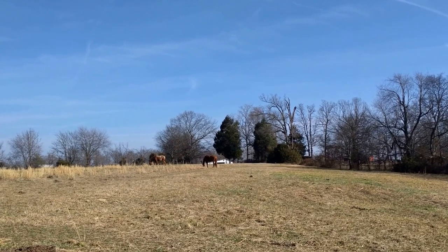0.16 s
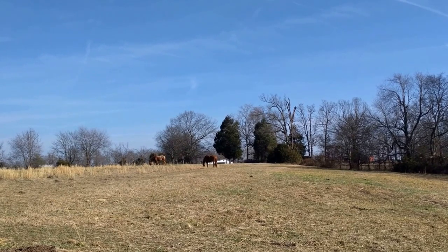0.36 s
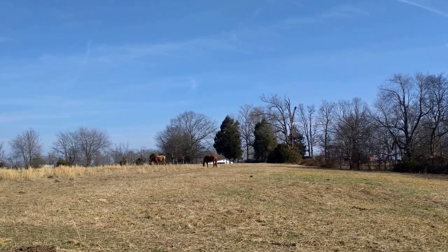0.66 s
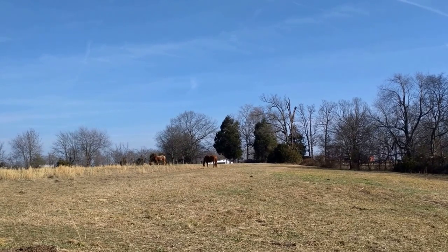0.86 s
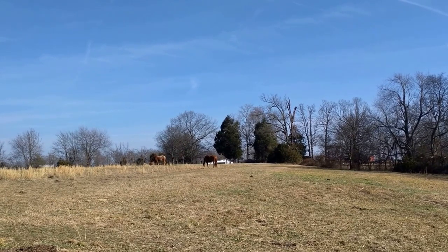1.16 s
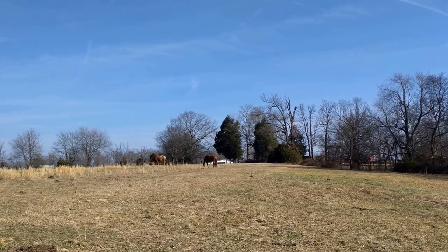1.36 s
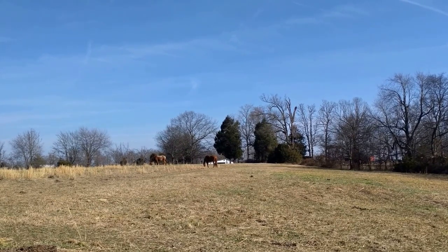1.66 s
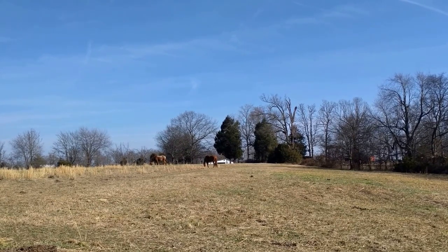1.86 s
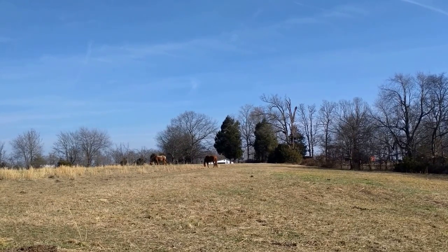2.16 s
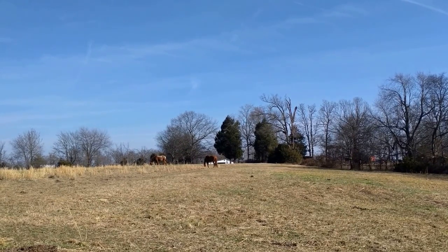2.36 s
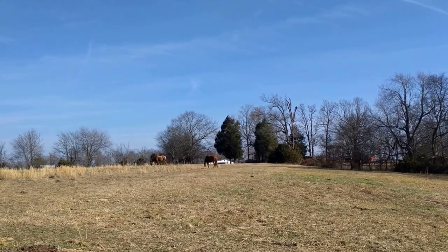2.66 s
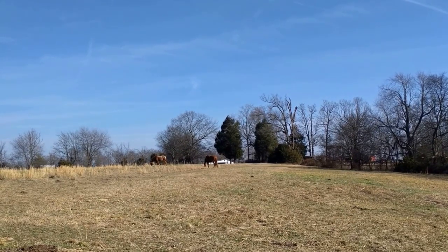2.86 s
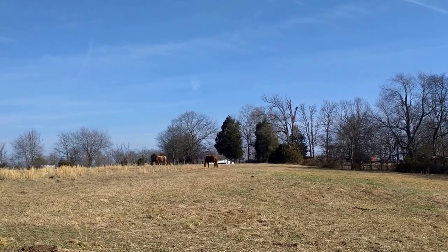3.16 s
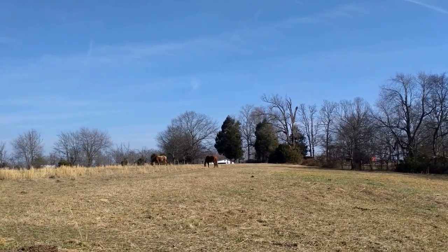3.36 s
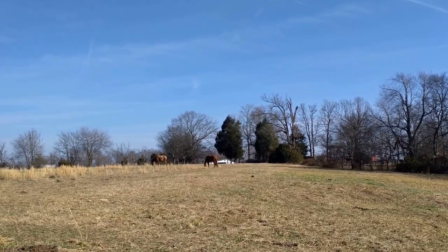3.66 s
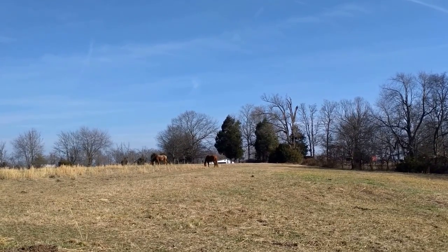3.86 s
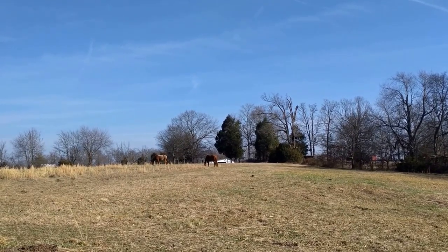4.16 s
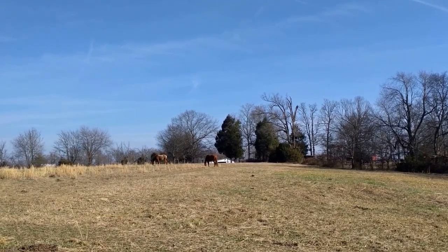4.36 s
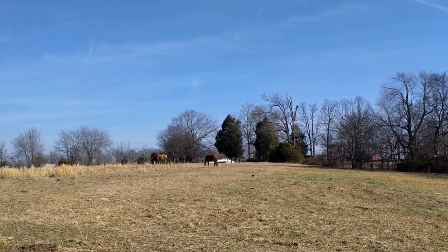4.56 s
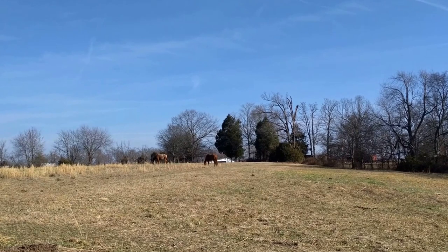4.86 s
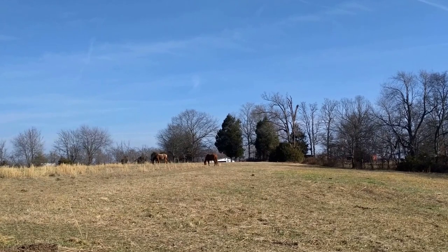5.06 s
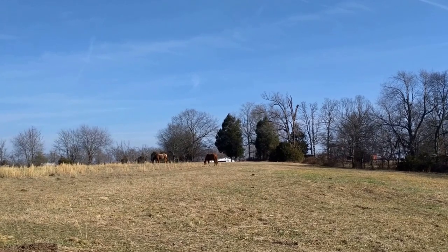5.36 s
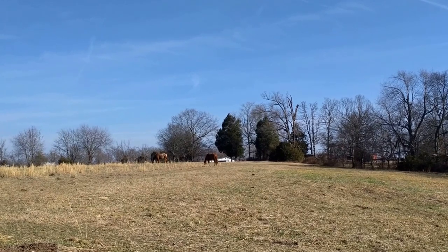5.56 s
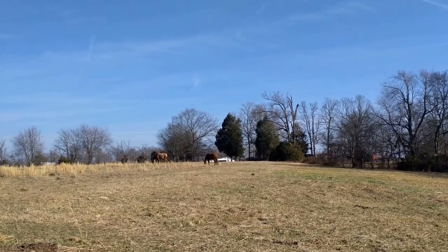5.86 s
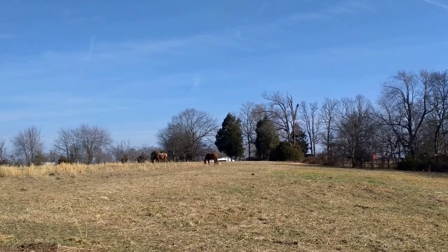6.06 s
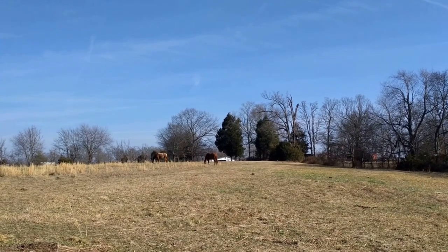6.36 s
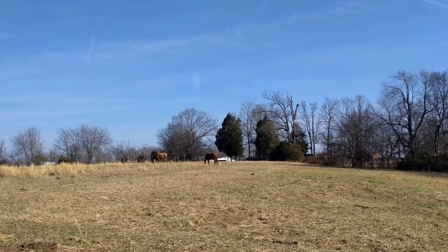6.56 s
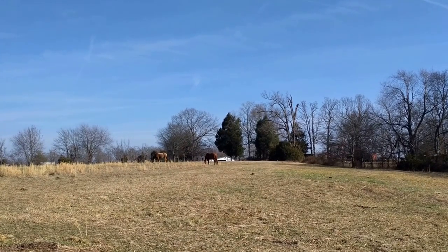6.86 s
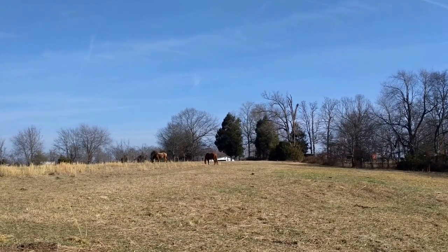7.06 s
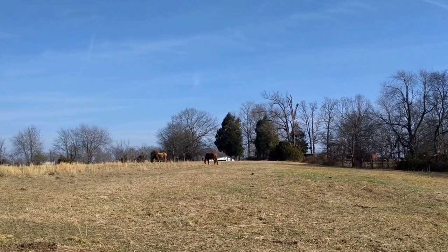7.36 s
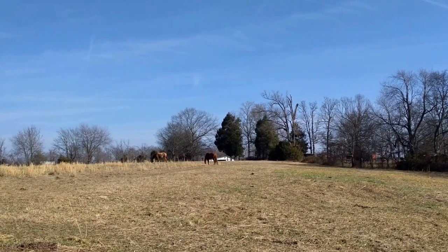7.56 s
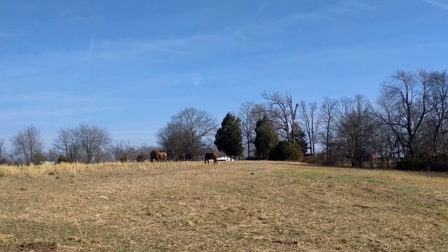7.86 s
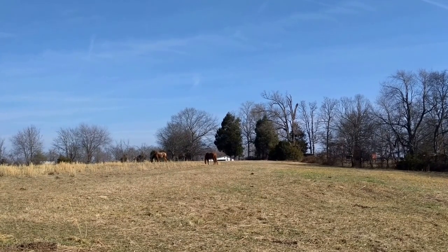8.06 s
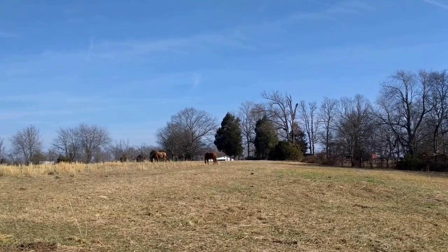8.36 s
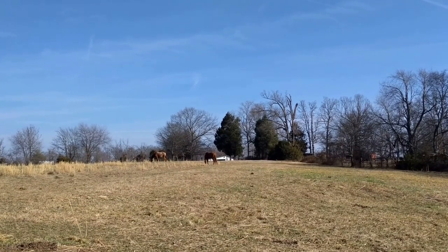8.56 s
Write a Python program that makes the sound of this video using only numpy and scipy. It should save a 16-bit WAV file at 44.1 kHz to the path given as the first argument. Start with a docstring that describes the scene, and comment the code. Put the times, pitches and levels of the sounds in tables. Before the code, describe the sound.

Wild birds whistle, warble, chirp and buzz across an open pasture while a distant hawk screams repeatedly and low wind gusts thump the microphone.

```python
"""Birdsong at a windy wood's edge

An open pasture by a wood: a distant hawk repeats a falling scream, a cardinal whistles long down-slurs, a
sparrow sings notes and buzzes, a bluebird-like voice warbles and small birds chirp in between. Voices are
sums of sine partials on moving pitch tracks; decaying noise echoes scatter them as the trees do. Wind and air
are shaped noise, ticks are short noise bursts, and gusts thump on the single microphone as brief low tones."""
import sys
import numpy as np
from scipy import signal
from scipy.fft import rfft, irfft, next_fast_len
from scipy.io import wavfile
from scipy.ndimage import uniform_filter1d, map_coordinates

SR = 44100
rng = np.random.default_rng(int(sys.argv[2]) if len(sys.argv) > 2 else 0)


def to_wav(sig):
    """Store sig (one row per channel, or 1-D mono) as 16-bit WAV at the path in sys.argv[1].

    Samples outside -1..1 are clipped; the rate is SR.
    """
    pcm = np.clip(np.atleast_2d(sig), -1, 1) * 32767
    pcm = np.round(pcm).astype(np.int16)
    wavfile.write(sys.argv[1], SR, pcm.T)  # frames by channels


N = 383669
TIME = np.arange(N) / SR  # seconds


def amp(db):
    """Logarithmic level: twenty decibels make a tenfold amplitude."""
    return 10 ** (np.asarray(db) / 20)


def unit(x):
    """Normalization: scale a signal to a root-mean-square of 1."""
    return x / np.sqrt(np.mean(x ** 2) + 1e-20)


def curve(x, points):
    """Linear interpolation at x through (position, value) points."""
    return np.interp(x, *np.transpose(points))


def wobble(rate, size=N):
    """Band-limited random modulation: a smooth curve through rate random knots a second."""
    knots = rng.standard_normal(400 + int(size * rate / SR))
    return map_coordinates(knots, [np.arange(size) * rate / SR + 2])


def filtered(x, response):
    """Linear filtering: multiply the spectrum by a response, a function of frequency in Hz."""
    m = next_fast_len(N + SR // 2)
    spectrum = rfft(x, m) * response(np.fft.rfftfreq(m, 1 / SR))
    return irfft(spectrum, m)[:N]


def noise(points):
    """Spectral shaping: random noise of rms 1 whose spectrum follows (Hz, dB) points."""
    f, db = np.transpose(points)

    def response(hz):
        """Decibels interpolated along a logarithmic frequency axis, as gain."""
        return amp(np.interp(np.log(hz + 1), np.log(f), db))

    return unit(filtered(rng.standard_normal(N), response))


def add(track, s, sound):
    """Superposition: mix a sound into the track at time s in seconds."""
    part = track[max(0, round(s * SR)):][:len(sound)]
    part += sound[:len(part)]


def progress(length):
    """Normalized time: a ramp from 0 to 1 over length seconds."""
    return np.linspace(0, 1, max(64, round(length * SR)))


def fading(cycles, depth):
    """Interference: gain in dB that dips once a cycle, as when a weaker copy cancels a sound."""
    copy = np.clip(depth, 0, .95) * np.exp(2j * np.pi * cycles)
    return 20 * np.log10(np.abs(1 - copy))


def whistle(hz, db, waver=0.0042, edge=.2, partials=((1, 0),)):
    """Syrinx tone: phase integrates an unsteady pitch, and edge is the share of the length spent in fades."""
    unsteady_hz = hz * (1 + waver * wobble(219.5, size=len(hz)))
    phase = 2 * np.pi * np.cumsum(unsteady_hz) / SR
    tone = sum(amp(level) * np.sin(round(k) * phase) for k, level in partials)
    envelope = signal.windows.tukey(len(hz), np.clip(edge, 0, 1))
    return np.sqrt(2) * amp(db) * tone * envelope


def glide(rows):
    """Frequency and amplitude contours through (s, pitch, dB) rows, the pitch corners rounded."""
    s, pitch, db = np.transpose(rows)
    duration = s[-1] - s[0]
    t = s[0] + duration * progress(duration)
    smooth_pitch = uniform_filter1d(np.interp(t, s, pitch), size=400, mode="nearest")
    return smooth_pitch, np.interp(t, s, db)


def wind(rumble_db=3.0, eddy_db=-2, lumpy_db=4.0, cycles=0.85, bluster_db=-15):
    """Turbulent pressure: rumble, with strong eddies that each shove the diaphragm and whirl briefly."""
    # Gusts of rumble. Each row: time in seconds, level in dB before rumble_db.
    gusts = [(0.0, -30.5), (0.19, -38.5), (0.36, -44), (1.09, -52.5), (1.87, -55.5), (2.15, -47.5),
             (2.45, -49), (2.59, -48), (3.39, -46.5), (3.8, -53.5), (4.09, -47.5), (4.65, -53), (5.77, -48),
             (6.06, -54), (6.59, -55), (7.68, -45.5), (8.07, -58), (8.7, -54)]
    # Strongest eddies. Each row: time in seconds, peak in dB before eddy_db, mid-thump pitch in Hz.
    eddies = [(0.011, -19, 110.6), (0.058, -26.5, 61), (0.256, -25.5, 51.7), (0.32, -21.5, 84),
              (0.374, -19, 95), (0.642, -29.5, 70), (1.191, -32, 66), (1.432, -27, 70), (2.007, -27, 77),
              (2.217, -32, 70), (2.667, -21.5, 102), (3.063, -23.5, 84.5), (3.327, -27, 73.6),
              (3.986, -30, 64), (4.948, -24.5, 119), (5.016, -27.5, 68.4), (5.864, -32.5, 102),
              (6.952, -30.5, 68), (7.02, -31.5, 76), (7.209, -31.5, 50.5), (7.634, -21.5, 76),
              (7.696, -26.5, 85), (7.836, -33.5, 101)]
    # Spectrum of the rumble. Each row: frequency in Hz, relative density in dB per Hz.
    rumble_spectrum = [(20, -47), (30, -37), (42, -1), (57, 3.5), (80, -2.5), (115, -7.5), (170, -14),
                       (260, -26), (450, -42), (2000, -100)]
    # Spectrum of the whirl inside an eddy. Each row: frequency in Hz, relative density in dB per Hz.
    whirl_spectrum = [(35, -7), (90, 7.5), (150, 2.5), (280, -11.5), (420, -34.5), (2000, -72)]

    lumpy = unit(noise(rumble_spectrum) * amp(lumpy_db * wobble(20)))
    out = amp(curve(TIME, gusts) + rumble_db) * lumpy
    whirl = np.zeros(N)
    for s, db, hz in eddies:
        start = max(0, s - .08)
        u = (start + .16 * progress(.16) - s) * hz  # cycles from the peak
        swell = amp(db) / np.cosh(u / cycles * 1.36)
        slowing = u - 0.37 * np.log(np.cosh(u))  # the thump sinks in pitch as the eddy passes
        thump = swell * np.sin(2 * np.pi * (slowing + rng.random()))
        add(out, start, amp(eddy_db) * thump)
        add(whirl, start, swell)
    return out + amp(bluster_db) * whirl * noise(whirl_spectrum)


def air(air_db=10.0):
    """Broadband background: shaped noise for the open field and the microphone's hiss, wavering slightly."""
    # Spectrum of the background. Each row: frequency in Hz, relative density in dB per Hz.
    air_spectrum = [(20, -16), (60, 27), (200, 16.5), (400, 12), (800, 6.5), (1500, 3), (2000, 5.5),
                    (2500, 11.5), (3100, 4), (4500, -0.5), (6500, -3.5), (9500, -4.5), (12500, -4),
                    (15500, -2.5)]
    # Slow course of its loudness. Each row: time in seconds, level in dB before air_db.
    hiss_levels = [(0, -66), (8.7, -64.5)]

    level_db = curve(TIME, hiss_levels) + air_db + 1.05 * wobble(7.5)
    return amp(level_db) * noise(air_spectrum)


def hawk(fade_db=4.0, flutter_db=0.8, swell_depth=.53, arch_db=2.5):
    """Harmonic voice: each scream scoops, sags and drops; its swelling second harmonic dominates."""
    # Screams. Each row: start in seconds, length in seconds, upper pitch of the sag in Hz before the contour,
    # relative levels of the fundamental and of the second harmonic in dB, fade of that harmonic from start
    # to end in dB, its swells per second, its first falter in seconds after the start.
    screams = [(0.02, 0.36, 1288, -69.5, -51.5, 11, 6.4, 0.016),
               (0.675, 0.36, 1329, -62.5, -51.5, 10.5, 7.6, 0.11),
               (1.32, 0.35, 1300, -65, -48, 7, 11.1, 0.093),
               (1.92, 0.349, 1308, -67.5, -54, -1.5, 7.6, 0.025),
               (2.51, 0.363, 1324, -68.5, -53.5, 11, 11.75, 0.057),
               (3.13, 0.4, 1303, -70.5, -55, 14, 5.6, 0.038),
               (3.78, 0.38, 1266, -68.5, -54.5, 9, 4.3, 0.03), (4.46, 0.37, 1241, -70, -55, 1, 6.4, 0.15),
               (5.09, 0.418, 1252, -67.5, -56.5, 12, 7.65, 0.011),
               (5.77, 0.39, 1281, -65, -57.5, 10.5, 6.1, 0.09),
               (6.47, 0.44, 1300, -65, -57.5, 2, 9.6, 0.043),
               (7.19, 0.43, 1284, -63, -52.5, 10, 4.3, 0.024),
               (7.94, 0.36, 1291, -66.5, -54.5, 8, 4.6, 0.045)]
    # Weak upper partials. Each row: multiple of the fundamental, relative level in dB.
    upper_partials = [(3, -69), (4, -80), (5, -82)]
    # Contour of scoop and final drop. Each row: share of the length, pitch ratio.
    contour = [(0, .9), (.06, .985), (.12, 1), (.86, 1.01), (.93, .98), (1, 0.887)]
    sag_end_hz = 1120  # before the contour

    out = np.zeros(N)
    for start, length, top_hz, low_db, level_db, drop_db, swell_rate, falter in screams:
        u = progress(length)
        sag_hz = top_hz + (sag_end_hz - top_hz) * u ** 1.15
        hz = sag_hz * curve(u, contour)
        arch = -arch_db * (2 * u - 1) ** 2
        swells_db = fading((u * length - falter) * swell_rate, swell_depth)
        main_db = level_db + arch - drop_db * (u - .5) + swells_db
        effort_db = 0.8 * (level_db + 51) - 5 * (u - .5)  # more effort, brighter voice
        partials = [(2, main_db)]
        # over the long path every weak partial fades in and out on its own
        for k, db in [(1, low_db), *upper_partials]:
            path_db = fade_db * wobble(13.56, size=len(u))
            partials.append((k, db + arch + effort_db * np.log(k) + path_db))
        flutter = flutter_db * wobble(55.4, size=len(u))
        add(out, start, whistle(hz, flutter, waver=0.0046, edge=0.12, partials=partials))
    return out


def chatter(count=150, centre_hz=3500, spread=0.29, bend=0.1067):
    """Random superposition: far birds toss in faint slurs at chance times and pitches."""
    # Loudness of the far birds. Each row: time in seconds, relative level in dB.
    loudness = [(0, -66.5), (1.3, -78), (2.3, -73), (2.7, -64.5), (3.6, -67), (5.6, -66.5), (8.7, -73.5)]

    out = np.zeros(N)
    starts = rng.uniform(0, N / SR, count)
    traits = np.clip(rng.standard_normal((count, 4)), -2, 2)
    for s, (size, pitch, slope, arch) in zip(starts, traits):
        u = 2 * progress(0.033 * np.exp(0.23 * size)) - 1
        hz = centre_hz * np.exp(spread * pitch + bend * (slope * u + arch * u ** 2 / 2))
        db = curve(s, loudness) - pitch - pitch ** 2  # middle voices carry best
        add(out, s, whistle(hz, db, waver=0.0074, edge=0.34))
    return out


def warbler():
    """Joint frequency and amplitude modulation: a mellow phrase recurs in bouts, clear or fluttering."""
    # Phrases. Each row: start in seconds, pitch of the arch in Hz, relative level in dB, flutter as a share
    # of the pitch.
    phrases = [(0.137, 2713, -50.5, 0.021), (2.515, 2732, -48.5, 0.033), (2.78, 2730, -51.5, 0.036),
               (3.024, 2720, -52, 0.02), (5.565, 2787, -46.5, .01), (5.814, 2770, -51, 0.018),
               (6.07, 2676, -52.5, .025), (6.315, 2725, -45, 0.0043), (7.765, 2730, -45.5, 0.0076),
               (8.011, 2764, -46, 0.013), (8.269, 2714, -45, 0.0061), (8.512, 2740, -41, 0.0044)]
    # One phrase, an arch and an upward flick. Each row: seconds after its start, pitch ratio,
    # relative level in dB.
    phrase_shape = [(0, .79, -18), (.03, .94, -5), (.055, 1, 0), (.07, .97, -1), (.086, .84, -12),
                    (.1, .9, -8), (.112, .95, -3), (.124, .98, -10)]

    out = np.zeros(N)
    ratio, shape_db = glide(phrase_shape)
    for s, hz, db, flutter in phrases:
        shake = flutter * wobble(300, size=len(ratio))
        level_db = db + shape_db + 60 * shake  # pitch and loudness shake together
        add(out, s, whistle(hz * ratio * (1 + shake), level_db, edge=0.043))
    return out


def chirpers(arch_octaves=0.109):
    """Logarithmic pitch glide: short slurs move up or down with the middle arched above a straight line."""
    # Chirps. Each row: start in seconds, length in seconds, middle pitch in Hz, glide in octaves,
    # relative level in dB.
    chirps = [(0.137, 0.064, 2980, -0.28, -55), (0.514, .046, 3100, -0.37, -56),
              (0.621, 0.08, 3190, -0.44, -52), (1.938, .12, 7100, .17, -71), (2.083, .08, 4240, -.05, -60),
              (2.15, .036, 4280, -.7, -57), (2.934, 0.057, 3770, -0.42, -59),
              (3.188, 0.025, 3500, 0.28, -43), (3.205, .036, 2990, -.42, -47),
              (3.242, 0.06, 2315, -0.25, -51), (3.315, 0.027, 2950, -.3, -46),
              (3.359, .028, 2615, 0.39, -43.5), (3.546, .021, 3350, -0.072, -50),
              (3.782, .036, 7050, -.45, -52), (3.781, 0.06, 2850, -0.72, -52.5),
              (3.821, 0.045, 3220, -0.4, -47.5), (3.952, 0.099, 2497, .18, -42.5),
              (4.052, 0.036, 2810, -0.057, -49), (4.958, 0.039, 2800, -0.26, -40),
              (4.989, .04, 1750, -.9, -58.5), (5.071, .13, 2400, 0.18, -46), (5.616, .04, 4770, .29, -57.5),
              (5.798, 0.052, 4320, -.09, -56.5), (7.385, 0.096, 2770, -.13, -53.5),
              (8.004, .023, 3350, .55, -53), (8.555, 0.041, 3230, -0.36, -49.5)]

    out = np.zeros(N)
    for s, length, hz, octaves, db in chirps:
        u = progress(length) - .5
        bend = octaves * u - arch_octaves * (2 * u) ** 2
        add(out, s, whistle(hz * 2 ** bend, db, waver=0.0062, edge=0.36))
    return out


def sparrow(sag=0.027, stray=.008):
    """Frequency modulation: sagging pipes, buzzes of fast repeated sweeps, and a see-saw of both."""
    # Opening notes. Each row: start in seconds, length in seconds, nominal pitch in Hz, relative level in dB.
    notes = [(2.905, 0.155, 4360, -62), (3.033, 0.11, 4590, -58), (3.363, 0.068, 4534, -51),
             (3.58, 0.099, 4560, -50.5), (3.721, 0.19, 3225, -60)]
    # Rapid buzzes and thin high trills. Each row: start in seconds, length in seconds, pitch in Hz,
    # sweep width in Hz, sweeps per second, relative level in dB.
    buzzes = [(2.409, 0.094, 4800, 907, 53, -66.5), (3.849, 0.26, 3970, 950, 69, -54.5),
              (6.093, .09, 8650, 300, 90, -67), (6.806, .05, 8260, 400, 84, -66),
              (7.606, 0.13, 8570, 450, 130, -66), (8.365, 0.12, 8480, 450, 130, -60)]
    # Quickening see-saw, a sharp chip then a clear note. Each row: start in seconds, relative chip level in dB.
    seesaw = [(4.157, -51), (4.36, -50.5), (4.555, -54.5), (4.73, -54), (4.861, -53), (4.988, -48.5),
              (5.119, -52)]
    chip_s, chip_hz, chip_sweep_hz, chip_rate = 0.028, 5420, 540, 250  # rate in sweeps per second
    # the clear note: delay after the chip, share of the beat that it fills, pitch, relative level
    pipe_lag_s, pipe_share, pipe_hz, pipe_db = .035, 0.54, 3447, -47.5

    out = np.zeros(N)
    beats = np.gradient([s for s, db in seesaw])
    pipes, chips = [], []
    for (s, db), beat in zip(seesaw, beats):
        strayed_hz = pipe_hz * (1 + stray * rng.standard_normal())
        pipes.append((s + pipe_lag_s, pipe_share * beat, strayed_hz, pipe_db))
        chips.append((s, chip_s, chip_hz, chip_sweep_hz, chip_rate, db))

    for s, length, hz, db in [*notes, *pipes]:
        u = progress(length)
        sagging_hz = hz * (1 + sag * (.4 - u))
        add(out, s, whistle(sagging_hz, db - 15 * u ** 3, waver=.002, edge=.5))

    for s, length, hz, width_hz, rate, db in [*buzzes, *chips]:
        cycle = progress(length) * length * rate % 1
        pulse = np.abs(np.sin(np.pi * cycle)) ** 0.78  # the voice dips between sweeps
        sweep_hz = hz + width_hz * (cycle - .5)
        add(out, s, pulse * whistle(sweep_hz, db, waver=0.0188, edge=0.17))
    return out


def ticks():
    """Impulsive sound: each tiny dry snap is a broad noise burst that decays by 60 dB in 14 ms."""
    # Small snaps close by. Each row: time in seconds, relative level in dB, centre of the spectrum in Hz.
    snaps = [(2.918, -36.5, 1000), (6.521, -49, 14000), (6.6, -50, 13000), (7.361, -47, 14100),
             (7.952, -37, 1320)]

    out, t = np.zeros(N), np.arange(SR // 20) / SR
    for s, db, hz in snaps:
        spectrum = [(hz / 10, -12), (hz / 2, 0), (hz, -2), (2 * hz, -4), (5 * hz, -24)]
        burst = noise(spectrum)[:len(t)]
        add(out, s, amp(db - 4 - 60 * t / .014) * burst)
    return out


def cardinal(dive_s=.028, ground_echo=.76):
    """Comb filtering: whistles with a faint octave dive, then fall through the notches of a ground echo."""
    # Down-slurs. Each row: start in seconds, length in seconds, height of the opening dive in Hz, first and
    # last pitch of the steady fall in Hz, relative level in dB, fade from start to end in dB,
    # spacing of the echo's notches in Hz.
    slurs = [(4.258, 0.49, 3360, 5930, 2020, -37, -1, 1712),
             (5.288, 0.48, 2552, 5846, 2033, -39.5, 0.5, 1670),
             (6.65, 0.11, 1907, 5100, 4620, -43, 3, 1890), (6.804, 0.36, 0, 4510, 2170, -48.5, 14.5, 2000)]
    # Loudness of the voice along its range. Each row: pitch in Hz, relative level in dB.
    voice = [(2000, -12), (2330, -6), (2700, -2), (3100, 1), (4100, -3), (4800, -10.5), (7000, -17.5),
             (9300, -34)]

    out = np.zeros(N)
    for s, length, dive_hz, first_hz, last_hz, db, drop_db, notch_hz in slurs:
        u = progress(length)
        fall_hz = first_hz + (last_hz - first_hz) * u
        hz = fall_hz + dive_hz * np.exp(-u * length / dive_s)
        echo_db = fading(hz / notch_hz, ground_echo)  # echo strength is a share of the direct sound
        level_db = db - drop_db * (u - .5) + curve(hz, voice) + echo_db
        add(out, s, whistle(hz, level_db, waver=.003, edge=0.05, partials=[(1, -0.5), (2, -36.5)]))
    return out


def woods(x, near_db, far_db, near_t60=0.13, far_t60=0.74):
    """Diffuse reverberation: nearby branches scatter at once, the tree line adds a long tail (T60 in s)."""
    t = np.arange(SR) / SR
    echo = np.zeros(SR)
    for db, t60 in ((near_db, near_t60), (far_db, far_t60)):
        onset = 1 - np.exp(-t / 0.003)
        tail = rng.standard_normal(SR) * amp(-60 * t / t60) * onset
        echo += amp(db) * tail / np.linalg.norm(tail)
    return x + signal.fftconvolve(x, echo)[:N]


def scene():
    """Superposition: birds, each with its own echo levels from the trees, over wind, air and ticks."""
    birds = amp(1.5) * woods(hawk(), near_db=-11.5, far_db=-13.5)
    birds += amp(4.0) * woods(chatter(), near_db=-5.5, far_db=-5)
    birds += amp(4.0) * woods(warbler(), near_db=-14.5, far_db=-10.5)
    birds += amp(-2.0) * woods(chirpers(), near_db=-11.5, far_db=-9.5)
    birds += woods(sparrow(), near_db=-8, far_db=-12)
    birds += amp(-2.0) * woods(cardinal(), near_db=-9, far_db=-11)
    return (birds + wind() + air() + ticks())[None]


def record(dry, low_cut_hz=33, top_hz=15750):
    """Band limiting: the recorder sheds the deepest bass and keeps nothing from top_hz upward."""
    def response(hz):
        """Gain of a gradual low cut and an abrupt upper limit."""
        return (hz < top_hz) / np.sqrt(1 + (low_cut_hz / (hz + 1)) ** 8)

    return filtered(dry[0], response)[None]


dry = scene()
out = record(dry)
to_wav(out)
```